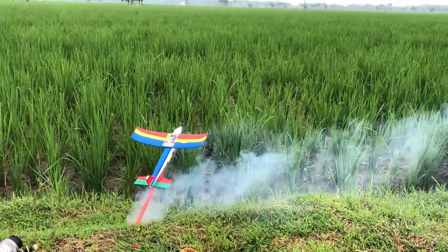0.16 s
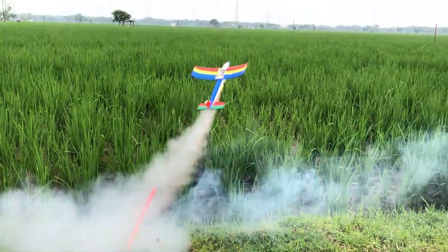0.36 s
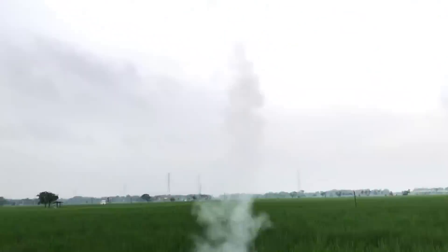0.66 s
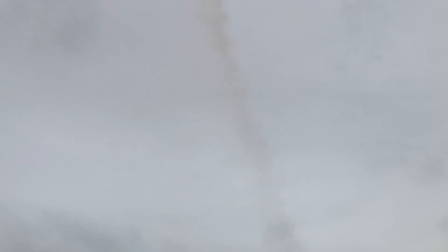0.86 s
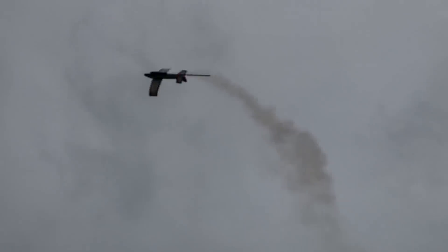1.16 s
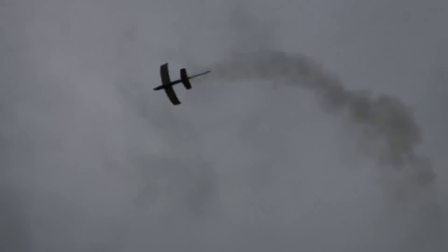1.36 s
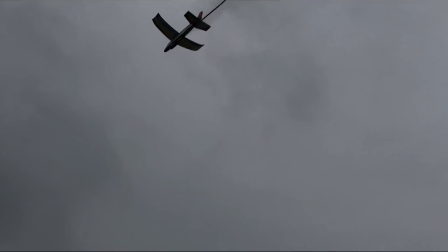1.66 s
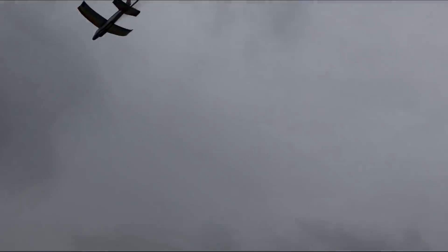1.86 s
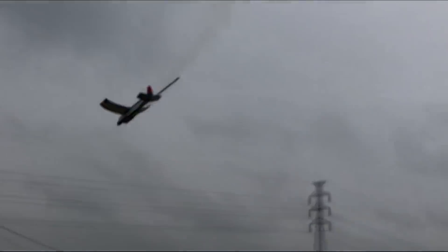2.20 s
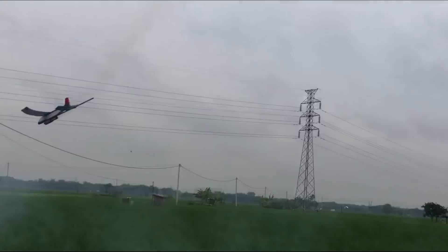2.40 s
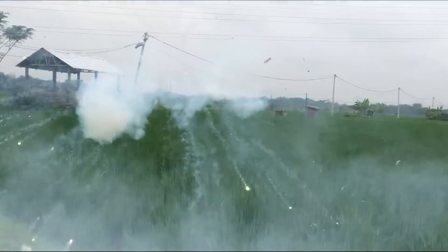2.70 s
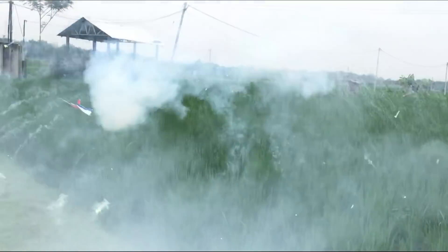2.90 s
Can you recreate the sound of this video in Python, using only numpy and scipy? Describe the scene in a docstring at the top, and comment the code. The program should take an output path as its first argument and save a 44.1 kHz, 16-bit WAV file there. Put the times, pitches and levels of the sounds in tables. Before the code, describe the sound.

A small firework rocket fizzes, then launches with a loud whoosh at about 0.3 seconds. By 0.7 seconds it drops to a thinner hiss, which grows louder and brighter as it dives back, with light wind puffing on the microphone. At 2.6 seconds it bursts with a sharp bang. Sparks sputter, two dull pops follow around 2.8 seconds, and echoes fade across the open field by 3 seconds.

```python
"""Rocket plane over a rice field

A toy plane on a firework rocket fizzes on the ground, lifts off with a roar of jet noise and hisses
louder as it dives back. Interference with its ground reflection sweeps through the hiss as it climbs
and falls. It bursts low down; sparks sputter, stars pop and the field echoes.
Air buffets the single microphone as it swings after the rocket."""
import sys
import numpy as np
from scipy import signal
from scipy.fft import rfft, irfft, next_fast_len
from scipy.io import wavfile
from scipy.ndimage import map_coordinates

SR = 44100
rng = np.random.default_rng(int(sys.argv[2]) if len(sys.argv) > 2 else 0)


def transcribe(signal):
    """Save signal, clipped to [-1, 1], as a 16-bit WAV file at the path in sys.argv[1]."""
    frames = np.atleast_2d(signal).T
    limited = np.clip(frames, -1, 1)
    pcm = np.round(limited * 32767).astype(np.int16)
    wavfile.write(sys.argv[1], SR, pcm)


N = 134505

CATCH_S, LIFT_S, CRUISE_S, BLAST_S, BURNOUT_S = 0.077, 0.272, 0.749, 2.598, 2.6
HANDOVER_S, TOP_HZ = 0.087, 15850


def amp(db):
    """Amplitude ratio of a level in decibels."""
    return 10 ** (np.asarray(db) / 20)


def unit(x):
    """Normalisation to rms 1."""
    return x / np.sqrt(np.mean(x ** 2) + 1e-20)


def clock():
    """Time of each sample in seconds."""
    return np.arange(N) / SR


def along(points, hz):
    """Interpolation of (Hz, value) points on a logarithmic frequency axis."""
    knots_hz, values = np.transpose(points)
    return np.interp(np.log(hz + 1), np.log(knots_hz + 1), values)


def curves(rows):
    """Linear interpolation, sample by sample, of each column after the time."""
    times, *columns = np.transpose(rows)
    return [np.interp(clock(), times, column) for column in columns]


def wobble(rate):
    """Smooth random modulation with rate knots a second."""
    return map_coordinates(rng.standard_normal(N), [clock() * rate], mode="wrap")


def filtered(x, response):
    """Linear filtering: the spectrum of x times a frequency response."""
    size = next_fast_len(N + 8192)
    return irfft(rfft(x, size) * response(np.fft.rfftfreq(size, 1 / SR)), size)[:N]


def noise(colour):
    """Band-limited noise of rms 1 with the given spectral envelope."""
    return unit(filtered(rng.standard_normal(N), lambda hz: amp(along(colour, hz)) * (hz < TOP_HZ)))


def glide(x, speed):
    """Resampling: every frequency in x is multiplied by the momentary speed."""
    return map_coordinates(x, [np.cumsum(speed)], mode="wrap")


def fade_in(s, length):
    """A linear ramp from 0 to 1 centred on time s."""
    return np.clip((clock() - s) / length + .5, 0, 1)


def burst(s, rise, t60):
    """A linear rise to 1 at time s, then exponential decay by 60 dB in t60 seconds."""
    t = clock() - s
    return np.clip(1 + t / rise, 0, 1) * amp(-60 * np.maximum(t, 0) / t60)


def bursts(rows, rise):
    """Superposition of decaying envelopes, one for each row."""
    return sum(amp(db) * burst(s, rise, t60) for s, db, t60 in rows)


def turbulence(flutter_db=0.12, crackle_db=1.14):
    """Amplitude modulation: uneven burning makes a flutter, tiny shocks a fine crackle."""
    return unit(amp(flutter_db * wobble(rate=69.77) + crackle_db * wobble(rate=1492)))


def air():
    """Wind noise: pressure fluctuations on the swinging microphone, over the rumble of the field."""
    # Puffs of air. Each row: peak time in seconds, level in dB, t60 in seconds.
    puffs = [(.01, -46.5, 1), (.76, -38, 0.29), (.955, -34.5, 0.36), (1.06, -40, 0.75),
             (1.175, -34.5, 0.29), (1.76, -42, 0.29)]
    # Spectra of the puffs and the rumble. Each row: frequency in Hz, relative level in dB.
    gust_colour = [(30, 5), (110, 2), (220, -2), (400, -14.5), (1500, -58)]
    field_colour = [(30, 2), (140, 3.5), (350, -6.5), (1500, -37), (16000, -50)]
    gusts = noise(gust_colour) * bursts(puffs, rise=0.049)
    return gusts + amp(-53.5 + 1.3 * wobble(rate=15)) * noise(field_colour)


def echoes():
    """Reflection returns the blast as echoes that sink in pitch, a dull tail and low booms."""
    # Echoes off sheds and trees, and far booms. Each row: time in seconds, level in dB, t60 in seconds.
    near_returns = [(2.612, -23, 0.09), (2.639, -28, 0.12), (2.661, -21, 0.2), (2.696, -25, 0.25),
                    (2.736, -32, 0.22), (2.8, -34.5, 0.24)]
    far_returns = [(2.745, -35, .3), (2.8, -36.5, 0.18), (2.948, -40, 0.202)]
    # Spectra of the reflected sound. Each row: frequency in Hz, relative level in dB.
    echo_colour = [(130, -26), (450, -4), (800, 0.5), (1750, 0), (2500, -11), (16000, -28)]
    tail_colour = [(80, -23), (200, -8), (550, 1), (1000, -6.5), (2000, -14.5), (16000, -25.5)]
    boom_colour = [(100, -20), (205, -5), (330, -13), (900, -49)]
    envelope = sum(amp(db) * burst(s + 0.0028, rise=0.0079, t60=t60) for s, db, t60 in near_returns)
    speed = 2 ** (-1.8 * np.maximum(clock() - BLAST_S, 0))  # down 1.8 octaves a second
    sinking = envelope * glide(noise(echo_colour), speed)
    tail = amp(-28.5) * burst(BLAST_S, rise=0.0049, t60=1) * noise(tail_colour)
    booms = bursts(far_returns, rise=0.014) * noise(boom_colour)
    return sinking + tail + booms


def sparks():
    """Unsteady combustion: scattered stars sputter out as deeply modulated noise."""
    # Flare and decay of the sparks. Each row: time in seconds, level in dB.
    levels = [(2.63, -37.5), (2.69, -25.5), (2.78, -42), (2.88, -55.5), (3.05, -59)]
    # Their spectrum. Each row: frequency in Hz, relative level in dB.
    colour = [(800, -11), (3000, 2), (7000, -4), (15500, -5)]
    level_db, = curves(levels)
    sputter = noise(colour) * turbulence(flutter_db=2, crackle_db=3)
    return amp(level_db) * sputter * fade_in(BLAST_S, 0.0098)


def star_pops():
    """Impulsive sources: two scattered stars go off with dull pops."""
    # The pops. Each row: peak time in seconds, level in dB, t60 in seconds.
    pops = [(2.761, -15, 0.039), (2.847, -26, 0.028)]
    # Their spectrum. Each row: frequency in Hz, relative level in dB.
    colour = [(100, -20), (350, 3), (1400, -2), (2500, -12.5), (12000, -29.5)]
    return noise(colour) * bursts(pops, rise=0.0016)


def spits():
    """Combustion transients: lumps of powder flare in the nozzle with short puffs."""
    # The flares. Each row: peak time in seconds, level in dB, t60 in seconds.
    flares = [(.288, -16, 0.046), (2.274, -26, 0.048)]
    # Their spectrum. Each row: frequency in Hz, relative level in dB.
    colour = [(100, -25), (500, 1), (1500, 5), (4500, -6), (12000, -19)]
    return noise(colour) * bursts(flares, rise=0.0023)


def ignition():
    """Exponential growth: the motor's fizz swells until lift-off, fastest in the treble."""
    # Spectrum of the fizz. Each row: frequency in Hz, relative level in dB.
    colour = [(400, -11.5), (1300, 0.5), (2400, -2), (4600, 2), (7200, -.5), (9400, -7), (12500, -4.5),
              (15400, 0.5)]
    hiss = noise(colour)
    treble = filtered(hiss, lambda hz: hz > 8000)
    age_s = np.clip(clock(), CATCH_S, LIFT_S) - CATCH_S
    swell = (hiss - treble) * amp(77.5 * age_s) + treble * amp(-3.5 + 110.5 * age_s)
    return amp(-37.5) * swell * turbulence() * (1 - fade_in(0.33, 0.13))


def over_ground(x, reflectance):
    """Interference of the direct sound with its ground reflection makes a moving comb filter."""
    # Delay of the reflection, following the rocket's elevation. Each row: time in seconds, lag in ms.
    lags = [(.3, .44), (.35, .48), (.38, .55), (.44, .85), (.5, 1.15), (.55, 1.62), (.65, 2.6), (1.5, 8.8),
            (2.25, 5.9), (2.57, 3)]
    lag_ms, = curves(lags)
    bounced = filtered(x, lambda hz: np.clip(along(reflectance, hz), 0, .9))
    delayed = map_coordinates(bounced, [np.arange(N) - lag_ms * SR / 1000])
    return x + delayed / (1 + (lag_ms / 6) ** 2)  # weaker with height: halved at a lag of 6 ms


def tilted(x):
    """Directivity: two spectral dips slide down through the hiss as the microphone tilts up."""
    # Paths of the dips. Each row: time in seconds, centre in Hz, depth in dB.
    first_dip = [(.8, 12000, 4), (.99, 10800, 5), (1.06, 8450, 8), (1.12, 7850, 8), (1.2, 7500, 1.5)]
    second_dip = [(.9, 16000, 1), (1.08, 14000, 3), (1.21, 12300, 4), (1.35, 8000, 4), (1.6, 7560, 3.5),
                  (2.3, 7340, 0.5)]
    width_octaves = 0.17
    hz, t, spectra = signal.stft(x, SR, nperseg=256)
    for dip in first_dip, second_dip:
        s, centre, depth_db = np.transpose(dip)
        octaves = np.log2((hz[:, None] + 1) / np.interp(t, s, centre))
        spectra *= amp(-np.interp(t, s, depth_db) * np.exp(-(octaves / width_octaves) ** 2))
    return signal.istft(spectra, SR, nperseg=256)[1][:N]


def flight():
    """Jet noise of the steady burn grows louder and brighter as the plane dives back."""
    # Band levels of the jet. Each row: time in seconds, then roar, hiss, upper hiss and sizzle in dB.
    levels = [(.76, -47.5, -41, -44, -53), (.88, -51.5, -42.5, -47.5, -49), (1.0, -49, -41.5, -45, -49),
              (1.12, -47.5, -38, -38.5, -43), (1.32, -43.5, -35.5, -38.5, -34.5),
              (1.72, -37.5, -31.5, -32.5, -31), (2.22, -36, -27, -29, -26), (2.56, -40.5, -27.5, -22, -27)]
    # Spectra of those bands. Each row: frequency in Hz, relative level in dB.
    roar = [(60, -30), (300, -10.5), (1500, 0.5), (2800, -4), (4500, -25.5)]
    hiss = [(900, -21.5), (1900, -19.5), (3300, -1.5), (5800, 4), (7200, 1), (9000, -37)]
    upper_hiss = [(5500, -24), (7700, -1.5), (12000, -7), (14000, -37)]
    sizzle = [(10000, -23), (12500, -7), (15600, -2.5)]
    colours = roar, hiss, upper_hiss, sizzle
    jet = sum(amp(db) * noise(colour) for db, colour in zip(curves(levels), colours))
    burning = fade_in(CRUISE_S, HANDOVER_S) * (1 - fade_in(BURNOUT_S, HANDOVER_S))
    return jet * turbulence() * burning


def launch():
    """Turbulent jet noise at full thrust; the roar sinks in pitch as the rocket speeds away."""
    # Band levels of the jet. Each row: time in seconds, then roar, hiss and sizzle in dB.
    levels = [(.278, -34, -25, -22), (.292, -18, -13, -13.5), (.306, -27, -20, -15.5),
              (.35, -23.5, -22.5, -12.5), (.375, -22.5, -19, -13), (.47, -22.5, -18, -16),
              (.53, -24, -20.5, -16), (.542, -20.5, -15.5, -14), (.648, -20.5, -17, -17),
              (.695, -41, -34.5, -32.5), (.77, -48, -33.5, -43)]
    # Pitch of the roar. Each row: time in seconds, centre in Hz.
    roar_pitch = [(.3, 2101), (.45, 1795), (.58, 1280)]
    # Band spectra, with the roar centred on 1500 Hz. Each row: frequency in Hz, relative level in dB.
    roar_colour = [(50, -32), (170, -9.5), (380, -9), (620, -4), (1500, 0.5), (2000, -1), (3200, -9.5),
                   (6000, -13)]
    hiss_colour = [(1200, -19.5), (2400, -3.5), (3200, -2.5), (5000, 0.5), (9000, -1.5), (12000, -17)]
    sizzle_colour = [(6000, -36), (9500, -10), (12500, -7), (15500, -2.5)]
    roar_db, hiss_db, sizzle_db = curves(levels)
    centre_hz, = curves(roar_pitch)
    roar = unit(glide(noise(roar_colour), centre_hz / 1500))
    jet = amp(roar_db) * roar + amp(hiss_db) * noise(hiss_colour) + amp(sizzle_db) * noise(sizzle_colour)
    thrust = fade_in(LIFT_S, 0.013) * (1 - fade_in(CRUISE_S, HANDOVER_S))
    return jet * turbulence(flutter_db=0.95, crackle_db=0.5) * thrust


def blast():
    """Sudden release of pressure: the casing rips, then the charge cracks and thuds in damped modes."""
    # Modes of the thud. Each row: frequency in Hz, level in dB, t60 in seconds.
    modes = [(297, -10.5, 0.07), (433, -14.5, 0.065)]
    # Spectra of the rip and the crack. Each row: frequency in Hz, relative level in dB.
    rip_colour = [(100, -28.5), (290, 4), (430, 2.5), (560, -16), (720, -14), (1000, -10.5), (1600, -3.5),
                  (1900, 7), (2150, -22), (2750, -8), (3050, -3.5), (3400, -21), (16000, -57)]
    crack_colour = [(60, -21), (160, -2.5), (700, 4.5), (1300, 4), (3500, -10.5), (16000, -13.5)]
    rip = amp(-2 + 447 * np.minimum(clock() - BLAST_S, 0)) * noise(rip_colour)  # grows 447 dB a second
    rip *= fade_in(2.578, 0.0074) * (1 - fade_in(BLAST_S, 0.0046))
    age_s = np.maximum(clock() - BLAST_S, 0)
    thud = sum(amp(db - 60 * age_s / t60) * np.sin(2 * np.pi * hz * age_s) for hz, db, t60 in modes)
    crack = amp(-7) * noise(crack_colour) * burst(BLAST_S, rise=0.001, t60=0.066)
    return rip + thud + crack


def scene():
    """Superposition of all sources at one microphone, which feeds both channels."""
    # Reflectance of the bare bank under the rocket and of the rice, which returns less treble.
    # Each row: frequency in Hz, reflected share of the amplitude.
    bank = [(5000, .65), (14000, .42)]
    rice = [(1800, .85), (4500, .38), (14000, .2)]
    grounded = over_ground(ignition(), bank)
    airborne = over_ground(launch() + tilted(flight()) + spits(), rice)
    mono = grounded + airborne + blast() + echoes() + sparks() + star_pops() + air()
    return np.array([mono, mono])


def record(dry):
    """Transduction: the microphone colours the sound, saturates softly and limits the band."""
    # Bass roll-off and notch of the microphone port. Each row: frequency in Hz, gain in dB.
    response = [(25, -14.5), (75, 0.5), (2500, 0), (2640, -6.5), (3100, -1)]
    ceiling = 0.84
    x = filtered(dry[0], lambda hz: amp(along(response, hz)))
    x = x / (1 + np.abs(x / ceiling) ** 6) ** (1 / 6)
    x = filtered(x, lambda hz: hz < TOP_HZ)
    return np.array([x, x])


dry = scene()
out = record(dry)
transcribe(out)
```